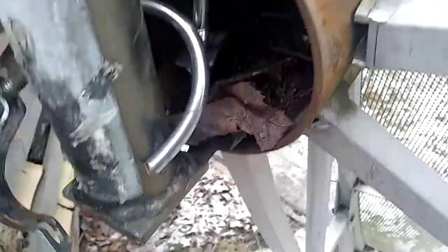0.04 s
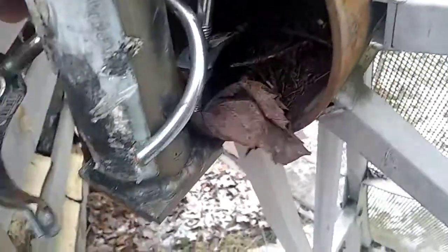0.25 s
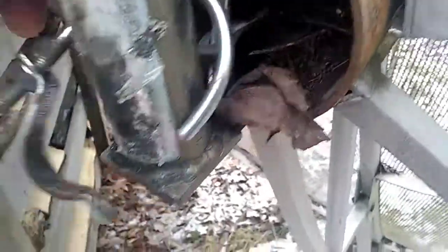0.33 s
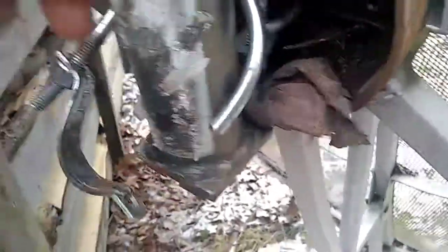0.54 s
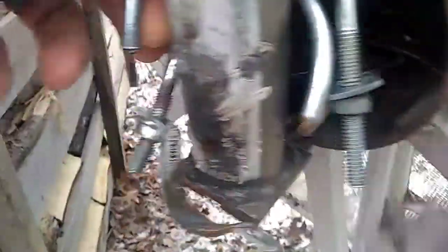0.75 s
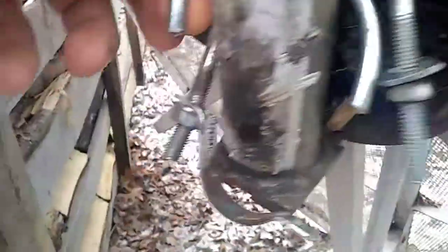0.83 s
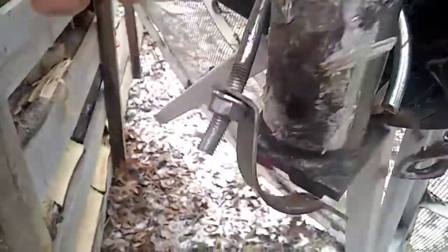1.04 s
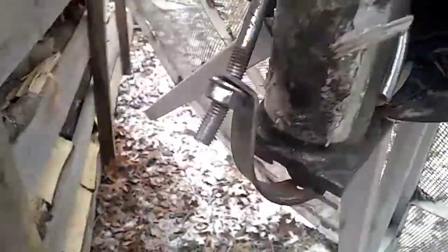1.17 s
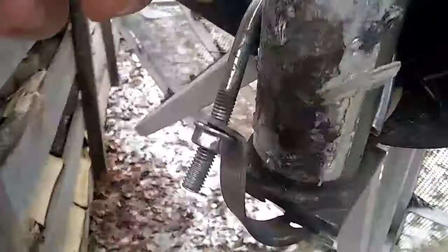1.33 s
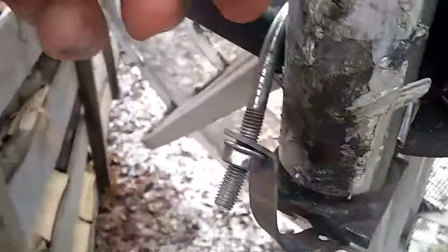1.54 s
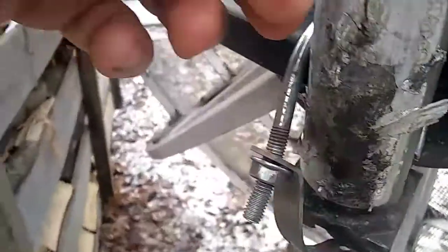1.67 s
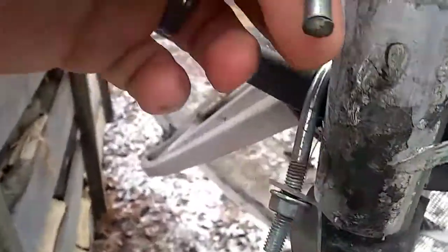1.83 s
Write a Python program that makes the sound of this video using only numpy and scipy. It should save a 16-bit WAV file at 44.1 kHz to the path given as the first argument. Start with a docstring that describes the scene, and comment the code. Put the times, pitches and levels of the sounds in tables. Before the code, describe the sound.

Loose steel clamp parts scrape, tick and clink brightly against a pipe, rattling hardest just after half a second, clinking sharply again near one second, then fading to sparse clicks and a soft tap; close, dry, outdoors.

```python
"""Loose steel clamp hardware on a pipe is turned over by hand, outdoors and close up.
Throughout, scraping threads are noise of tiny clicks in still air; a saddle clinks as a sum of dying modes,
and knocks ring the pipe's low modes over a noisy frame. Dead ticks follow as milliseconds of noise,
then a U-bolt clinks, a low thud swells and a washer clinks, each small part with modes of its own.
The parts settle with a few scattered clicks and one soft tap; faint dense reflections follow the steel."""
import sys
import numpy as np
from scipy import signal
from scipy.fft import rfft, irfft
from scipy.io import wavfile

SR = 44100
rng = np.random.default_rng(int(sys.argv[2]) if len(sys.argv) > 2 else 0)


def log_audio(samples):
    """Write samples as a 16-bit WAV file to the path given in sys.argv[1]."""
    # one column per channel
    frames = np.atleast_2d(samples).T
    # limit to full scale, then quantise
    limited = np.clip(frames, -1, 1)
    pcm = np.round(limited * 32767).astype(np.int16)
    wavfile.write(sys.argv[1], SR, pcm)


N = 83790  # samples
T = np.arange(N) / SR  # seconds
HZ = np.maximum(np.fft.rfftfreq(2 * N, 1 / SR), 1)  # bins of the zero-padded spectrum
CUTOFF_HZ = 14800
RELEASE_S = 1.29  # the hardware stops rubbing on the pipe
ROD_OFF_DB_PER_OCTAVE, PLATE_OFF_DB_PER_OCTAVE = 39, 18.5  # mode loss away from the best excited pitch


def from_db(db):
    """Level to amplitude: 20 dB is a factor of ten."""
    return 10 ** (np.asarray(db) / 20)


def at_hz(points):
    """Spectral interpolation: levels in dB joined by straight lines on a log-frequency axis."""
    hz, db = np.transpose(points)
    return np.interp(np.log(HZ), np.log(hz), db)


def panned(db):
    """Constant-power panning: left and right gains for a level difference, left minus right."""
    gains = from_db(np.array([[.5], [-.5]]) * db)
    return gains / np.sqrt(np.mean(gains ** 2, axis=0))


def coloured(x, points, sides=1):
    """Linear filtering: multiply spectra, with a gain that keeps the power of white noise."""
    gain = from_db(at_hz(points))
    gain = gain / np.sqrt(np.mean(gain ** 2))
    return irfft(rfft(x, 2 * N) * sides * gain)[..., :N]


def dying(t60):
    """Exponential decay of a damped vibration, 60 dB down after t60 seconds."""
    return np.exp(-np.log(1000) * T[:int(2 * t60 * SR) + 2] / t60)


def burst(t60):
    """Decaying noise: a dense response with independent sides, each of unit energy."""
    fall = dying(t60)
    x = rng.standard_normal((2, N))[:, :len(fall)] * fall
    return x / np.sqrt(np.sum(x ** 2, axis=1, keepdims=True))


def add(out, s, x):
    """Superposition: mix a sound in at s seconds."""
    i = max(int(s * SR), 0)
    out[:, i:i + x.shape[1]] += x[:, :N - i]


def ring(hz, t60, pan_db):
    """Damped modal vibration: one decaying sine, reaching each side at a phase of its own."""
    fall = dying(t60)
    right_lag = rng.uniform(-1.3, -.6) * np.pi / 2
    phase = 2 * np.pi * rng.random() + np.array([[0], [1]]) * right_lag
    return panned(pan_db) * fall * np.sin(2 * np.pi * hz * T[:len(fall)] + phase)


def clinks(modes, strikes, off_db_per_octave):
    """Modal synthesis: the contact point favours some modes; a tight grip shortens and sharpens the ring."""
    grip_sharpens = 0.037  # rise in pitch, as a share, that a full grip approaches
    out = np.zeros((2, N))
    for s, db, best_hz, share in strikes:
        sharpening = 1 + grip_sharpens * max(1 - share, 0) ** 3
        for hz, mode_db, t60, pan_db in modes:
            loss_db = off_db_per_octave * abs(np.log2(hz / best_hz))
            mode = ring(hz * sharpening, t60 * share, pan_db)
            add(out, s, from_db(db + mode_db - loss_db) * mode)
    no_bass = signal.butter(2, 2000, "high", fs=SR, output="sos")  # small parts radiate no bass
    return signal.sosfilt(no_bass, out)


def wander(step_s):
    """Random modulation: straight lines between normal values of unit spread, a new one at every step."""
    moments = np.arange(0, T[-1] + step_s, step_s)
    return np.interp(T, moments, rng.standard_normal(len(moments)))


def sliding():
    """Stick-slip friction: threads and edges slip in chattering clumps of clicks, each scratch its own colour."""
    # Steel sliding on steel. Each row: time in seconds, relative level in dB.
    slide_level = [(0, -44), (.064, -53.5), (.084, -26), (.125, -33.5), (.19, -40.5), (.212, -23),
                   (.238, -45), (.272, -29), (.306, -41), (.335, -47.5), (.355, -28), (.385, -43.5),
                   (.414, -25.5), (.433, -33), (.472, -26.5), (.506, -50), (.526, -36), (.547, -62),
                   (.563, -22.5), (.613, -21), (.632, -24), (.66, -20.5), (.674, -40), (.692, -22),
                   (.745, -43), (.85, -65.5), (.888, -45.5), (.912, -60.5), (.941, -24), (.966, -28),
                   (.986, -26), (.998, -32.5), (1.07, -42), (1.082, -30), (1.102, -66.5), (1.165, -47.5),
                   (1.22, -67), (1.33, -55.5), (1.51, -78.5), (1.528, -31.5), (1.562, -54), (1.69, -71),
                   (1.735, -48.5), (1.775, -64.5), (1.9, -76)]
    slips_per_s, slide_db = 20000, 1
    chatter_s, chatter_db = .002, 2.5  # swing of the slips from one clump to the next
    scratch_s, scratch_db = .012, 4.5  # swing of each band from one scratch to the next
    slips = (rng.random(N) < slips_per_s / SR) * from_db(chatter_db * wander(chatter_s))
    spectrum = rfft(slips * rng.standard_normal((2, N)), 2 * N)
    grain = 0
    centres, width = np.linspace(0, CUTOFF_HZ, 30, retstep=True)
    for hz in centres:
        triangle = np.maximum(1 - abs(HZ - hz) / width, 0)
        band = irfft(spectrum * triangle)[:, :N]
        grain = grain + band * from_db(scratch_db * wander(scratch_s))
    level_db = slide_db + np.interp(T, *np.transpose(slide_level))
    return from_db(level_db) * grain / grain.std()


def clamp(x):
    """Resonance by convolution: every contact briefly rings the tightly held clamp."""
    # Short resonances of the assembled clamp. Each entry: frequency in Hz.
    clamp_hz = [2512, 3718, 4200, 4554, 6172, 6686, 7094, 8442, 9778, 10624, 11433, 12500]
    t60_s, clamp_db = 0.019, -11
    body = sum(ring(hz, t60_s, 0) for hz in clamp_hz)
    body = body / np.sqrt(np.sum(body ** 2, axis=1, keepdims=True))
    return x + from_db(clamp_db) * signal.fftconvolve(x, body, axes=1)[:, :N]


def contacts(slide, hits):
    """Source, resonator and radiation: slips and ticks ring the clamp, and are coloured and placed."""
    # Colour of a hard contact. Each row: frequency in Hz, relative level in dB.
    contact_colour = [(200, -67.5), (700, -33.5), (1600, -17), (2600, -5.5), (4100, 1.5), (5400, -0.5),
                      (7000, 0), (10500, -2), (15000, -14)]
    # Extra lean of the treble. Each row: frequency in Hz, left minus right in dB.
    treble_lean = [(1300, 4.5), (2400, -11.5), (4400, 5), (8000, -4.5), (14000, -9.5)]
    # Where the contact sits, before that lean. Each row: time in seconds, left minus right in dB.
    place = [(.3, -4), (.6, -2.5), (.94, 0), (.98, 3.5), (1.52, 2)]
    placed = panned(np.interp(T, *np.transpose(place))) * clamp(slide + hits)
    return coloured(placed, contact_colour, panned(at_hz(treble_lean)))


def yard(steel):
    """Diffuse reflection: convolution with a short decaying noise gives faint echoes from the yard."""
    t60_s, yard_db = 0.053, -19.5
    return from_db(yard_db) * signal.fftconvolve(steel, burst(t60_s), axes=1)[:, :N]


def still_air():
    """Stationary background noise: white noise filtered to a mostly low colour."""
    # Colour of the air. Each row: frequency in Hz, relative level in dB.
    air_colour = [(20, -26.5), (65, 2), (115, 0.5), (200, -11), (1000, -19.5), (14000, -28.5)]
    return from_db(-66.5) * coloured(rng.standard_normal((2, N)), air_colour)


def pipe(slide):
    """Modal excitation: knocks ring the pipe's low modes; knocks and rubbing sound the frame behind it."""
    # The pipe's modes. Each row: frequency in Hz, relative level in dB, t60 in seconds.
    pipe_modes = [(576, -6, .2), (775, -4, .24), (1222, -1, .3), (1292, -2, .42), (1410, -1, .35),
                  (2050, -1, .22)]
    # Dense wash of the frame behind the pipe. Each row: frequency in Hz, relative level in dB.
    frame_colour = [(130, -56), (270, -4.5), (450, -9), (800, -5.5), (1350, -1), (2050, 0.5), (2700, -6),
                    (14000, -45.5)]
    # Knocks that reach the pipe. Each row: start in seconds, relative level in dB.
    knocks = [(.001, -35.5), (0.339, -31.5), (.518, -39), (.603, -35), (.69, -34), (.938, -31.5),
              (1.02, -35.5), (1.077, -34), (1.135, -43)]
    pipe_db, rub_db = -8, -11.5
    frame_db, frame_t60_s = 3, 0.16
    tail_db, tail_t60_s = -3.5, 0.5  # the frame's middle register outlasts the rest of its wash
    tube, tail = np.zeros((2, 2, N))
    frame = from_db(rub_db) * slide * (T < RELEASE_S)
    for s, db in knocks:
        for layer, level_db, t60 in ((frame, frame_db, frame_t60_s), (tail, tail_db, tail_t60_s)):
            fall = dying(t60)
            noise = rng.standard_normal((2, N))[:, :len(fall)]
            add(layer, s, from_db(db + level_db) * fall * noise)
        for hz, mode_db, t60 in pipe_modes:
            strike_db = rng.normal(0, 2.5)  # each knock weights the modes anew
            add(tube, s, from_db(db + pipe_db + mode_db + strike_db) * ring(hz, t60, 0))
    middle = coloured(tail, [(400, -25), (1400, -2.5), (3500, -39.5)])
    return tube + coloured(frame, frame_colour) + middle


def saddle():
    """Plate modes: the loose flat saddle clinks with many close partials."""
    # Each row: frequency in Hz, relative level in dB, free t60 in seconds, left minus right in dB.
    saddle_modes = [(3898, -12, .2, 0), (4100, -3, .27, 5), (5329, -5, .09, 0), (7097, 0, .12, 1),
                    (7403, -13, .15, -3), (7828, -13, .11, -3), (10020, -11, .13, -8), (11430, 1, .1, -13),
                    (12330, -7, .07, -12), (13190, -6, .12, -10)]
    # Each row: start in seconds, relative level in dB, best excited pitch in Hz, share of the free ring time.
    strikes = [(.001, -35, 6600, 0.5), (.351, -16, 7500, 1), (.937, -5.5, 7500, 1.2),
               (0.943, -21, 4280, 1.5), (1.016, -20, 8500, 0.99), (1.135, -21.5, 6850, 0.28),
               (1.146, -13.5, 7200, 0.18)]
    return clinks(saddle_modes, strikes, PLATE_OFF_DB_PER_OCTAVE)


def ticks():
    """Heavily damped impact: parts held tight hit each other and die within milliseconds."""
    # Dead ticks. Each row: start in seconds, relative level in dB.
    tick_hits = [(.176, -33.5), (0.1791, -15.5), (.188, -23.5), (0.1992, -18), (.261, -18.5),
                 (0.277, -19.5), (0.294, -21), (0.3116, -11), (0.3377, -21), (0.3926, -12.5), (0.4673, -16),
                 (.486, -16), (.516, -9.5), (.555, -13.5), (0.5664, -15), (0.5846, -11.5), (.602, -6),
                 (0.6085, -7.5), (0.6133, -6), (0.646, -11), (0.657, -25), (0.6903, -18), (0.9195, -27),
                 (0.936, -9.5), (.984, -17.5), (1.078, -28.5), (1.111, -31), (1.136, -32.5), (1.149, -31),
                 (1.2817, -40.5), (1.3021, -35), (1.311, -28.5), (1.3143, -25), (1.342, -38.5),
                 (1.388, -39.5), (1.523, -24.5), (1.575, -45), (1.5945, -38), (1.704, -44.5)]
    t60_s, tick_db = 0.0086, 19
    out = np.zeros((2, N))
    for s, db in tick_hits:
        add(out, s, from_db(db + tick_db) * burst(t60_s))
    return out


def thock(hits):
    """Band-pass response: ticks on the heavy pipe jolt it, adding a brief, dull body until the release."""
    band = signal.butter(2, (249, 1510), "band", fs=SR, output="sos")  # Hz
    once = signal.sosfilt(band, hits * (T < RELEASE_S))
    return from_db(-11.5) * signal.sosfilt(band, once)


def u_bolt():
    """Rod modes: the loose bent rod clinks with a few wide-spaced partials."""
    # Each row: frequency in Hz, relative level in dB, free t60 in seconds, left minus right in dB.
    rod_modes = [(3325, -5, .2, -9), (6682, -2, .05, -11), (9420, -1, .13, -18), (12210, -4, .1, -19)]
    # Each row: start in seconds, relative level in dB, best excited pitch in Hz, share of the free ring time.
    strikes = [(.338, -4.5, 6682, 1.06), (.3385, -3.5, 11300, .85), (.689, -10, 9420, 0.2),
               (.889, -36, 9420, 1.6), (.9205, -19, 9420, 3), (.939, -23, 3325, 1.44),
               (.98, -13.5, 3325, 1.05), (0.982, 1, 11000, .28), (0.9955, -6, 9420, 0.97),
               (1.311, -11.5, 9420, 0.09), (1.313, -26.5, 10000, 0.99), (1.392, -10.5, 8200, 0.074)]
    return clinks(rod_modes, strikes, ROD_OFF_DB_PER_OCTAVE)


def bump():
    """Low-frequency impact noise: a handling thud, to the right, swells and decays under the hardest rattle."""
    # Colour of the thud. Each row: frequency in Hz, relative level in dB.
    bump_colour = [(20, -10), (60, -13), (120, -9), (600, -56)]
    start_s, rise_s, t60_s = .608, 0.015, 0.28
    age = T - start_s
    rise = np.clip(age / rise_s, 0, 1)
    fall = np.exp(-np.log(1000) * np.maximum(age - rise_s, 0) / t60_s)
    rumble = coloured(rng.standard_normal((2, N)), bump_colour)
    return from_db(-41) * panned(db=-19.0) * rise * fall * rumble


def washer():
    """Plate modes: the loose washer clinks once with a few high partials."""
    # Each row: frequency in Hz, relative level in dB, free t60 in seconds, left minus right in dB.
    washer_modes = [(4129, 10, .13, 0), (8093, 4, .52, -11), (9814, -7, .11, -8), (13600, 11, .085, -18)]
    # Each row: start in seconds, relative level in dB, best excited pitch in Hz, share of the free ring time.
    strikes = [(0.6907, -15.5, 10230, 0.77)]
    return clinks(washer_modes, strikes, PLATE_OFF_DB_PER_OCTAVE)


def taps():
    """Strongly damped modes: a soft, hollow tap and its rebound, to the left."""
    # Each row: start in seconds, relative level in dB.
    tap_hits = [(1.833, -35), (1.863, -60)]
    # Each row: frequency in Hz, relative level in dB, t60 in seconds.
    tap_modes = [(1350, -3, .009), (1650, 0, .016), (2000, 2, .018), (2550, -7, .012)]
    pan_db = 9.5  # left minus right
    out = np.zeros((2, N))
    for s, db in tap_hits:
        for hz, mode_db, t60 in tap_modes:
            fall = dying(t60)
            tone = fall * np.sin(2 * np.pi * hz * T[:len(fall)])
            add(out, s, from_db(db + mode_db) * panned(pan_db) * tone)
    hollow = signal.butter(2, [1100, 3400], "band", fs=SR, output="sos")
    return signal.sosfilt(hollow, out)


def scene():
    """Superposition: the hardware, faint reflections from the yard and still air."""
    slide, hits = sliding(), ticks()
    parts = saddle() + u_bolt() + washer()
    steel = contacts(slide, hits) + thock(hits) + parts + taps()
    return steel + yard(steel) + pipe(slide) + bump() + still_air()


def record(dry):
    """Clipping and band limitation: the loudest peaks overload and the top is cut."""
    low_pass = signal.ellip(8, .3, 60, CUTOFF_HZ, fs=SR, output="sos")
    return signal.sosfilt(low_pass, np.clip(dry, -.88, .88))


dry = scene()
out = record(dry)
log_audio(out)
```